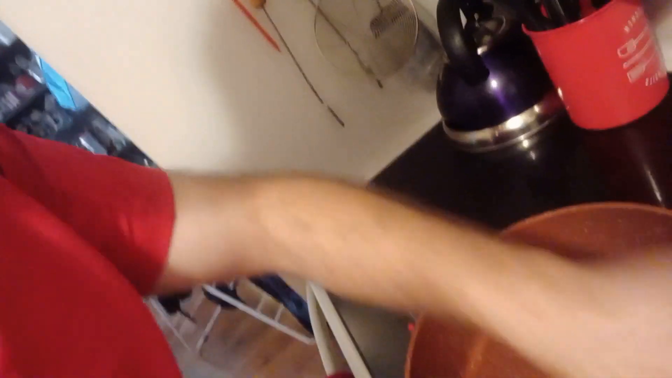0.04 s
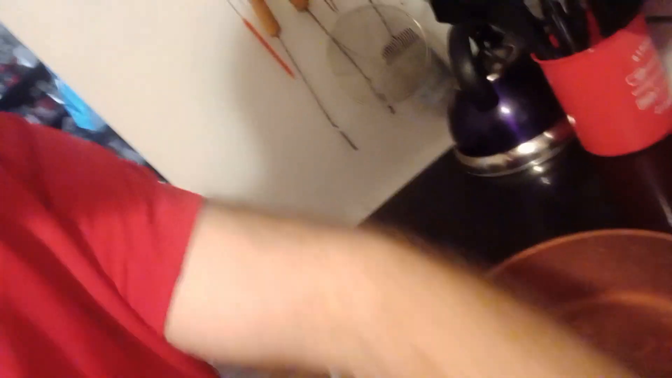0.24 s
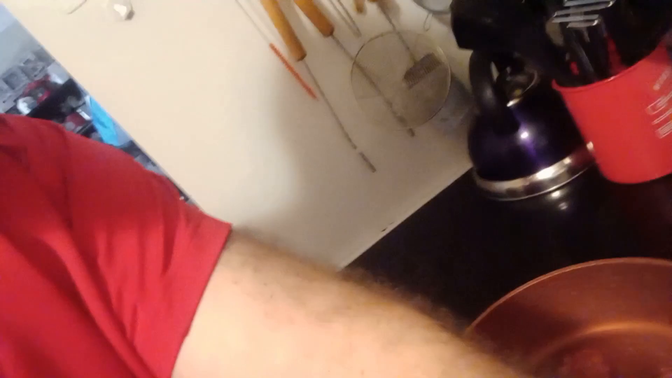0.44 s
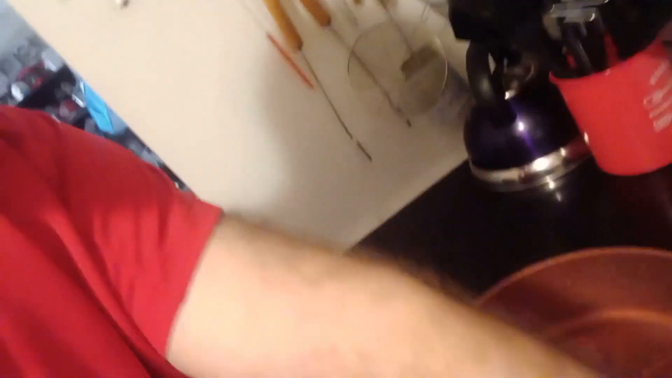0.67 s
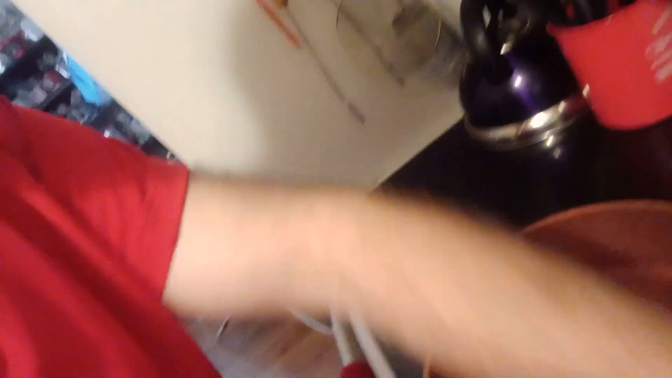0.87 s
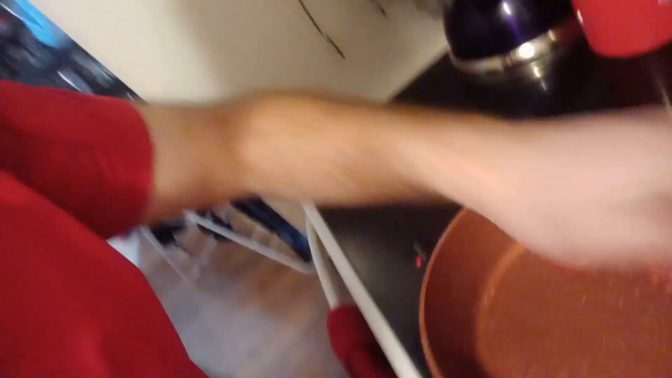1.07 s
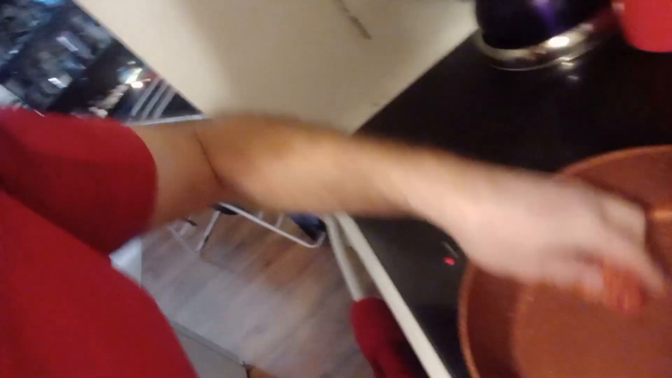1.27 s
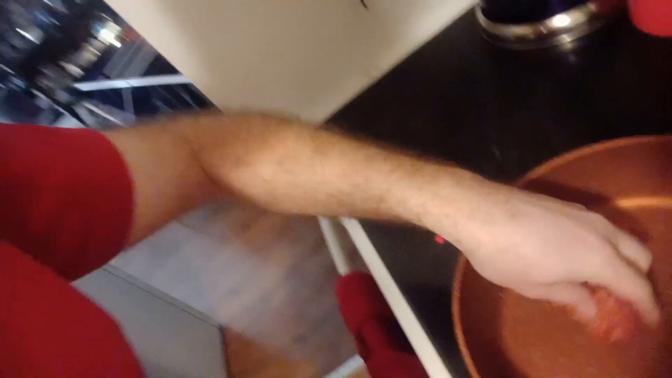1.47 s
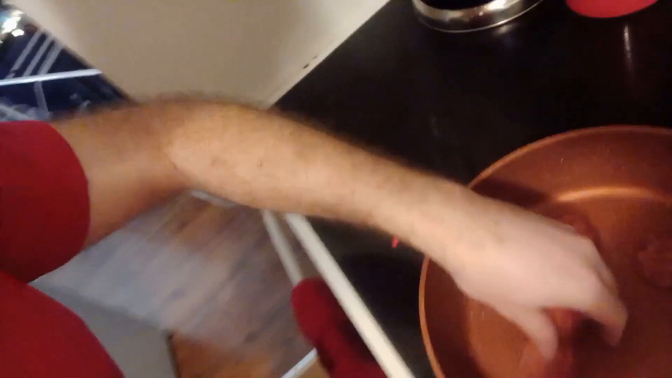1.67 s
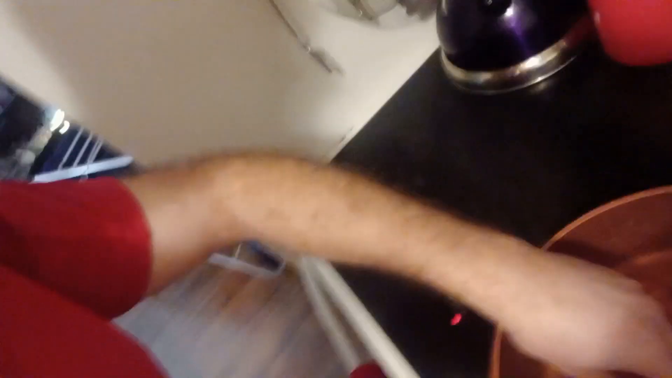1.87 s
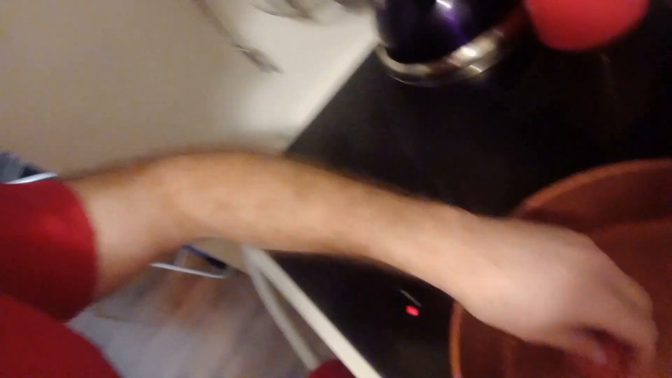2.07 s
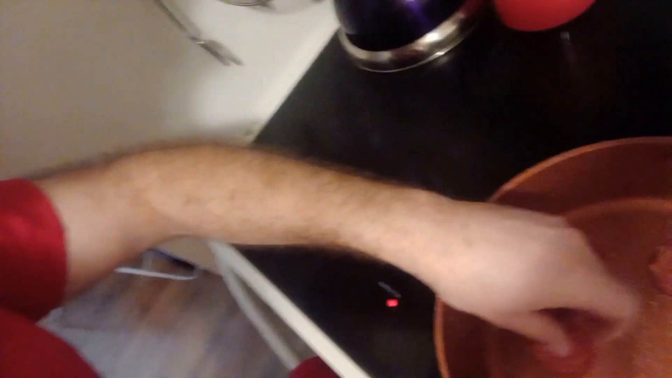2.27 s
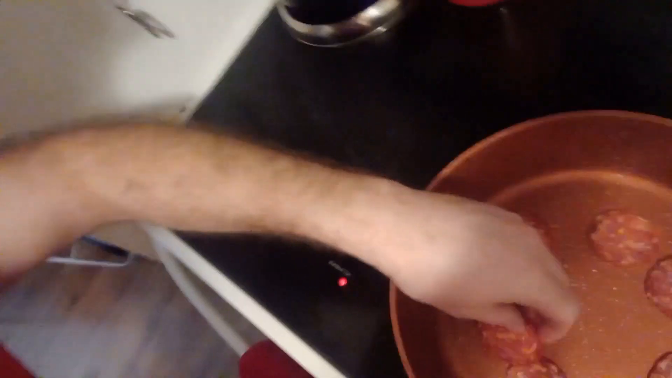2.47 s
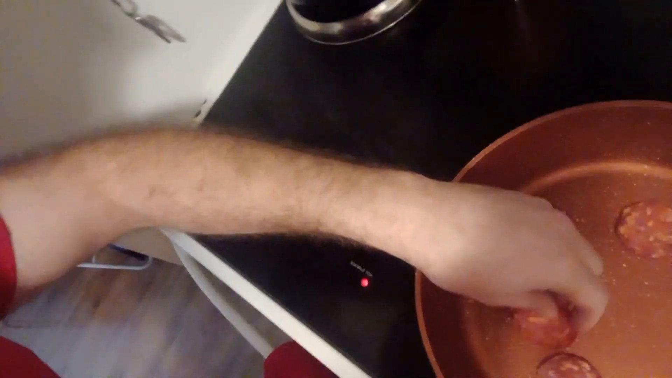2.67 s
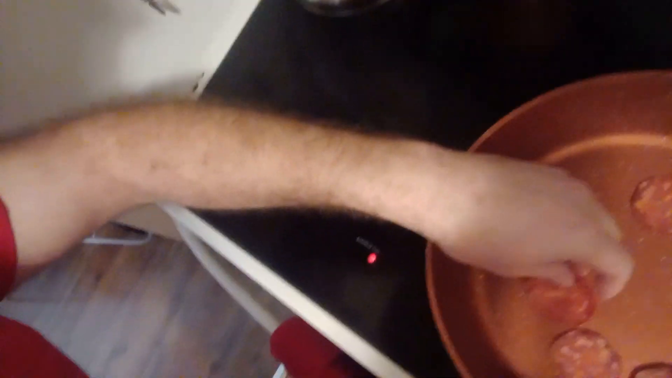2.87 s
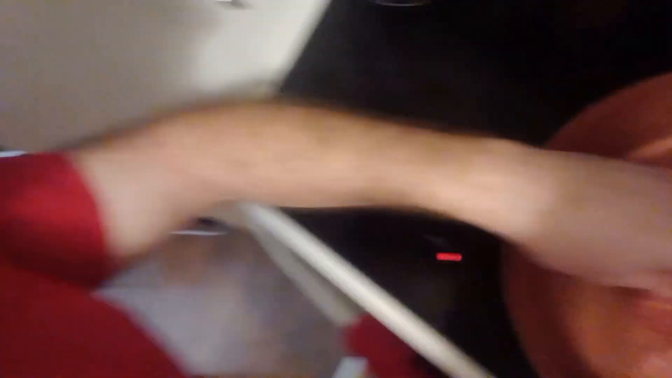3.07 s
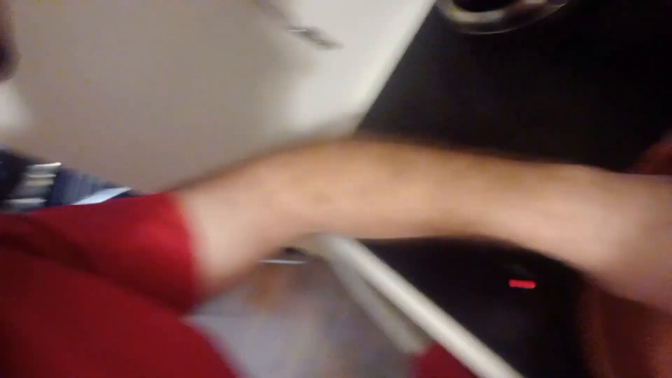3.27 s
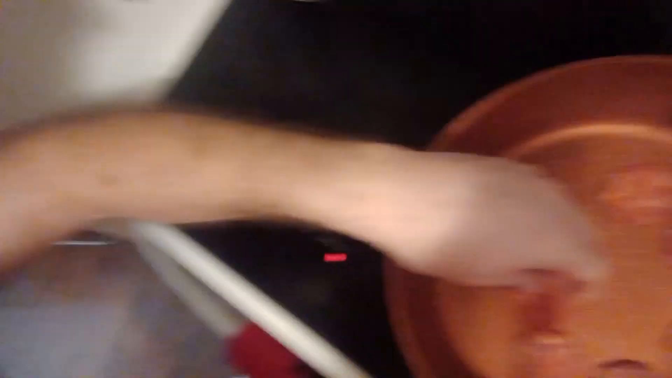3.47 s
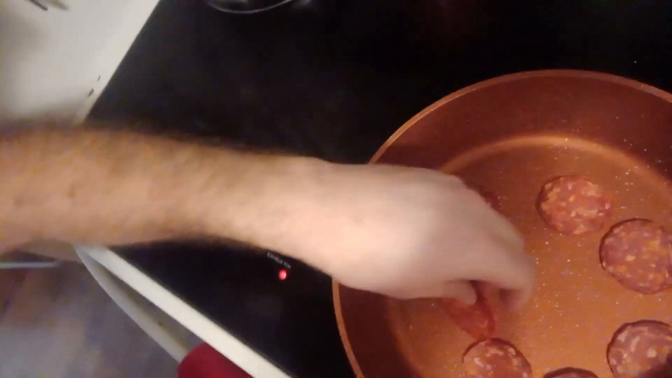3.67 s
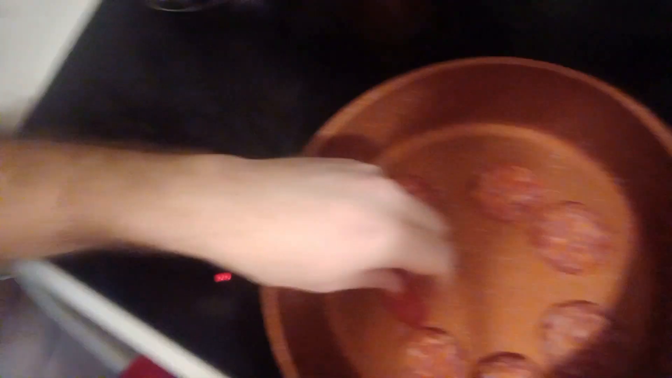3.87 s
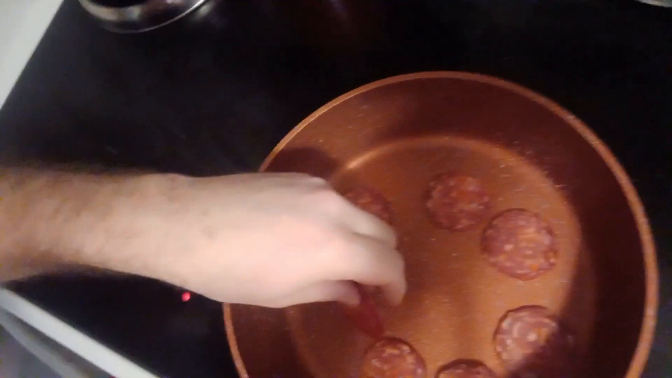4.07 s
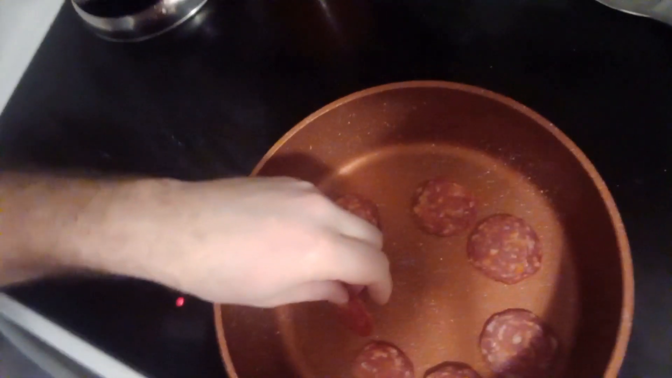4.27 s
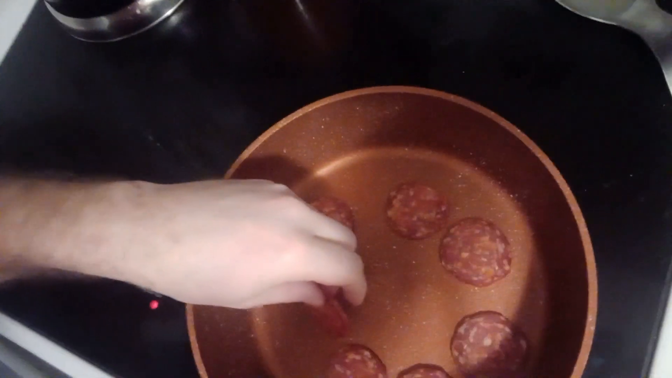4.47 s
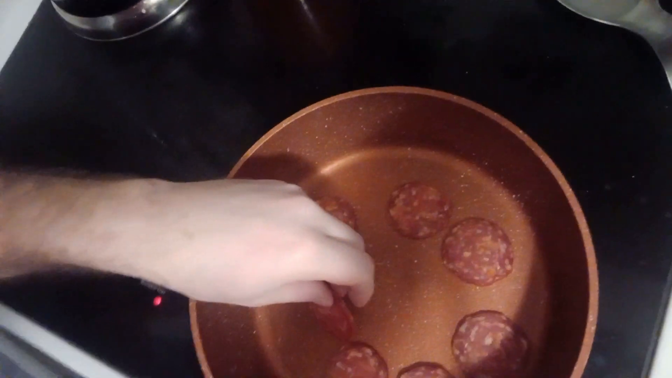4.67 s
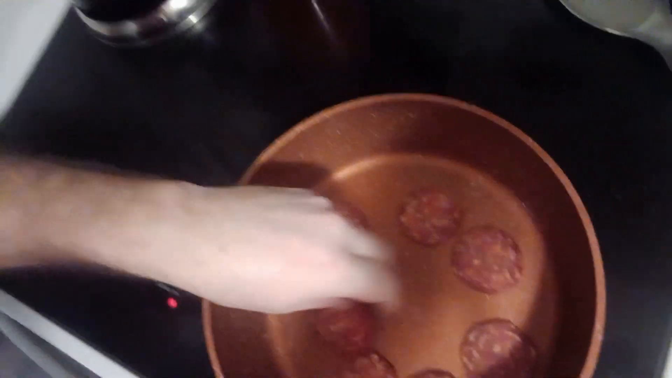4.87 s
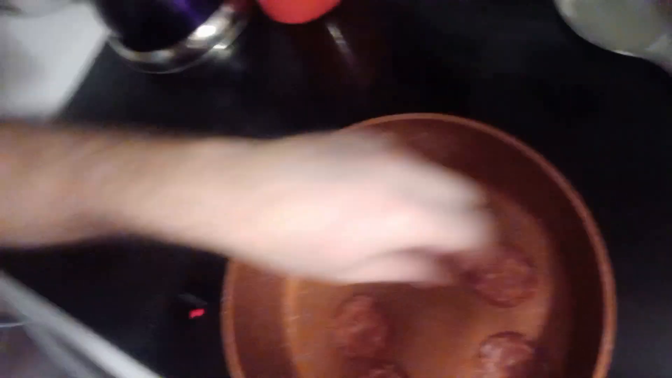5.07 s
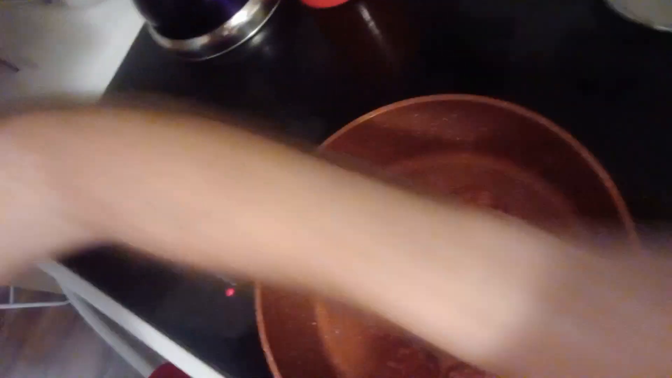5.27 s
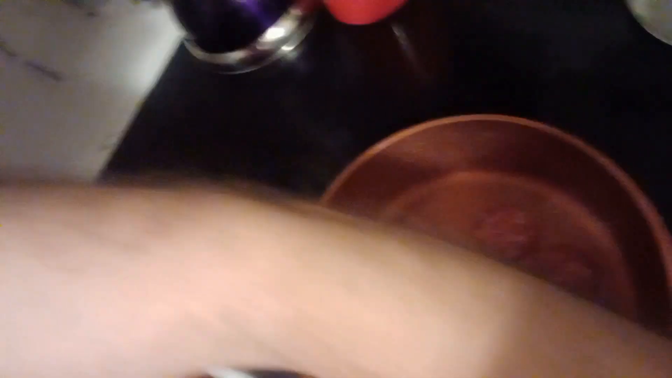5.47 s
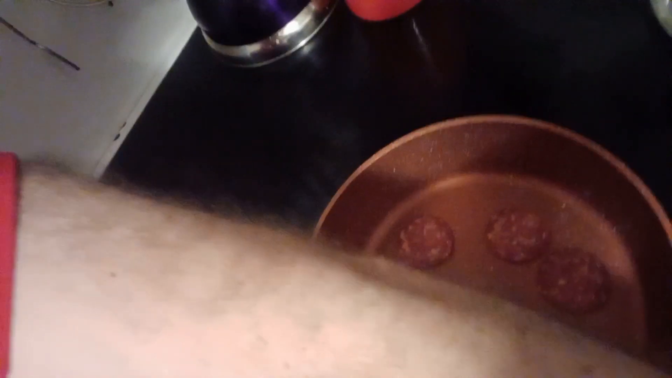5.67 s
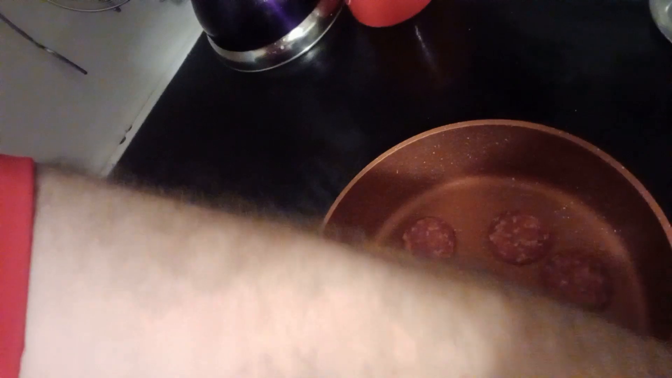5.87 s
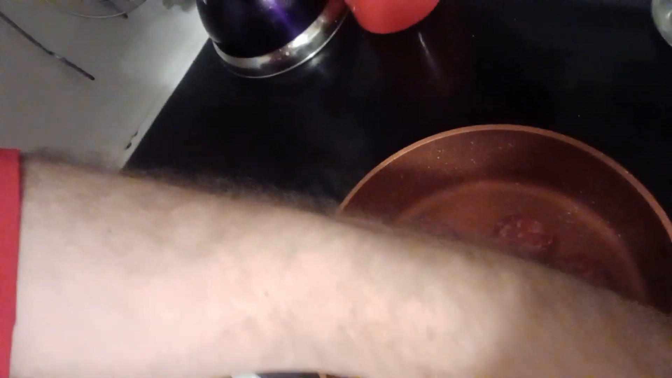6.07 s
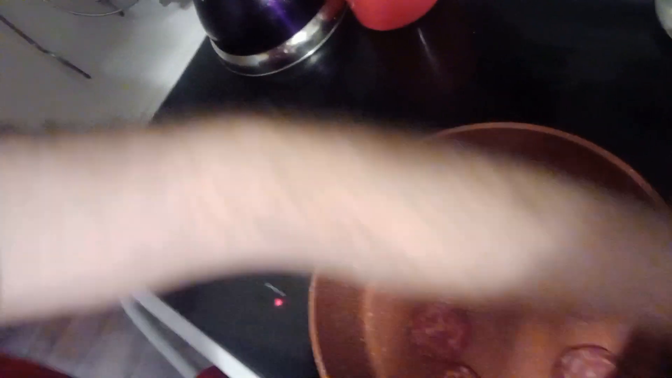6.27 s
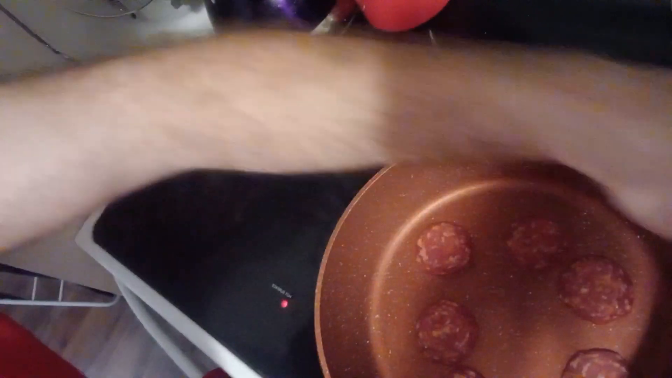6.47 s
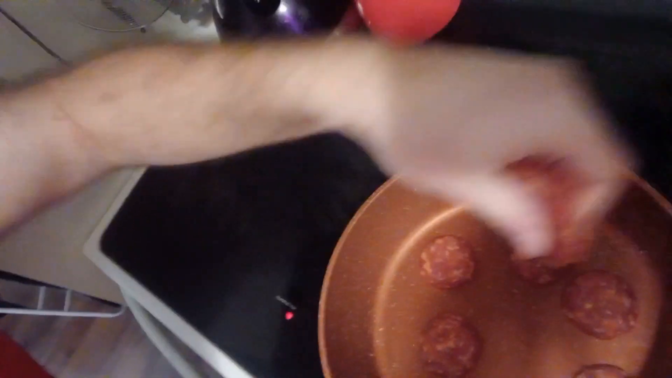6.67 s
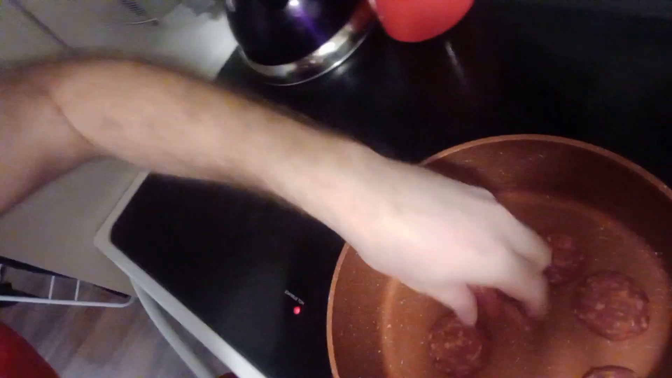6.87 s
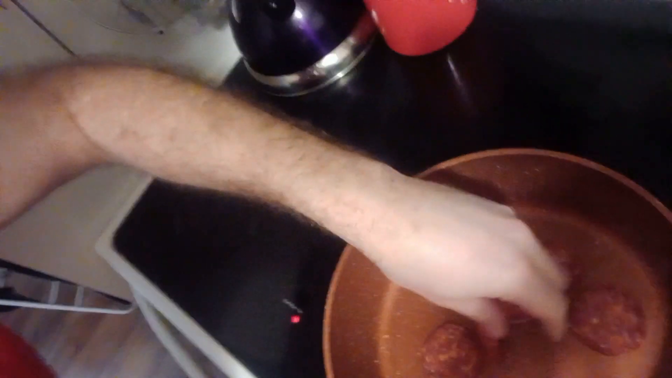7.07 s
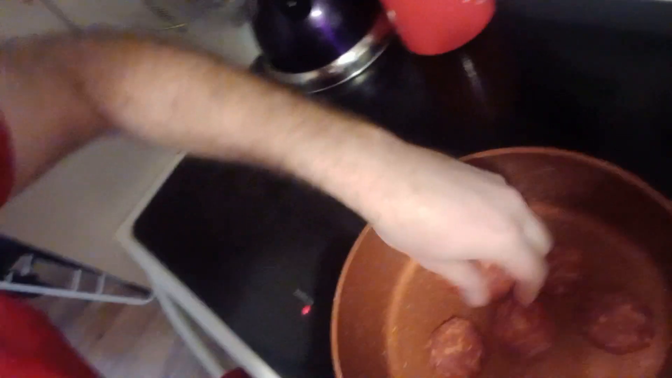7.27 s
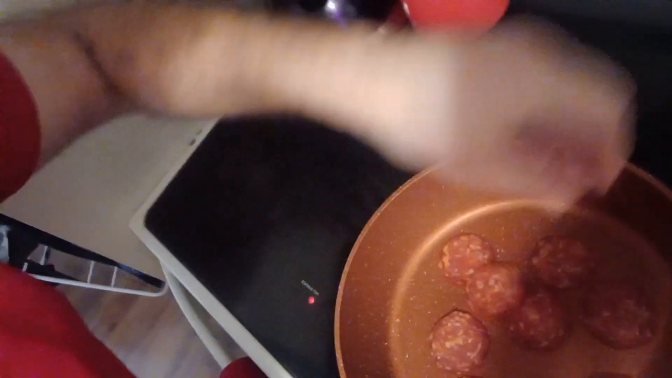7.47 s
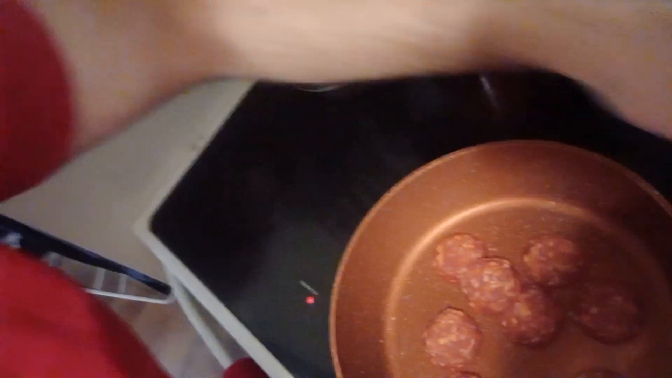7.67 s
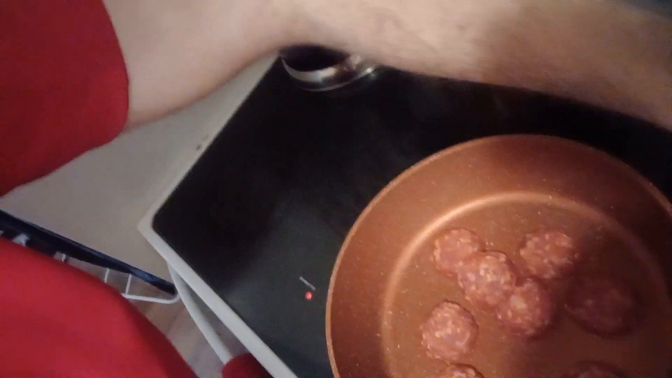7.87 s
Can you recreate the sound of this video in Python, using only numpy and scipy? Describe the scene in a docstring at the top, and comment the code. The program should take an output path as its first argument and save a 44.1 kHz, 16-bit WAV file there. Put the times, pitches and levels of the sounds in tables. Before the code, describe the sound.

Cured meat fries in a pan about an arm's length from the microphone, a little to the right. A thin fizz with scattered pops swells over the first three seconds, then keeps crackling and spitting. A couple of knocks on the pan come early and a cluster of rattling knocks comes later. Under it are a steady fridge hum, faint sleeve rustle, tiny metal tinks and a few dull floor thuds in a small kitchen.

```python
"""A fridge hums and a faint sizzle starts, growing as slices of cured meat are laid into a hot pan.
Water in the fat bursts into dense tiny clicks and louder spits. A hand and sleeve rustle, metal tinks,
shifts of weight thud through the floor, and fingers knock the pan so it rattles on the stove top.
All is heard from a small camera an arm's length away, which turns towards the pan halfway through."""
import sys
import numpy as np
from scipy import signal
from scipy.fft import rfft, irfft
from scipy.io import wavfile
from scipy.ndimage import uniform_filter1d

SR = 44100
rng = np.random.default_rng(int(sys.argv[2]) if len(sys.argv) > 2 else 0)


def output_pcm(signal):
    """Save a mono or channel-first signal as 16-bit PCM at the path in sys.argv[1].

    Samples are clipped to [-1, 1] before scaling.
    """
    pcm = np.clip(np.atleast_2d(signal).T, -1, 1) * 32767
    wavfile.write(sys.argv[1], SR, np.round(pcm).astype(np.int16))


N = 349713
TIME_S = np.arange(N) / SR
LEFT_LAG_S = 2.2e-4  # sound from the pan reaches the left microphone later


def undb(db):
    """Turn decibels into a gain to multiply by."""
    return 10 ** (np.asarray(db) / 20)


def level(x, db):
    """Set the average (rms) level."""
    return x * undb(db) / np.sqrt(np.mean(x ** 2))


def curve(table):
    """Join a table's timed rows with straight lines, giving values for every sample."""
    times_s, *columns = np.transpose(table)
    return [np.interp(TIME_S, times_s, column) for column in columns]


def colour(x, *spectra):
    """Shape the tone with the sum of tables whose rows are pitch_hz, level_db."""
    log_hz = np.log(np.linspace(1, SR / 2, 4097))
    gain_db = sum(np.interp(log_hz, np.log(hz), np.clip(db, -60, 60))
                  for hz, db in map(np.transpose, spectra))
    cepstrum = irfft(np.log(undb(gain_db)))
    cepstrum[1:4096] *= 2  # folded so the filter rings only after a click, never before
    cepstrum[4097:] = 0
    return signal.oaconvolve(x, irfft(np.exp(rfft(cepstrum))))[:N]


def band(x, low_hz, high_hz):
    """Keep the sound between two pitches."""
    return signal.sosfilt(signal.butter(2, [low_hz, high_hz], "band", fs=SR, output="sos"), x)


def keep_side(x, side, edge_hz, order=2):
    """Keep the sound on the "low" or "high" side of a pitch."""
    return signal.sosfilt(signal.butter(order, edge_hz, side, fs=SR, output="sos"), x)


def wander(rate_hz):
    """A smooth random wobble, about 1 in size."""
    hold = int(SR / rate_hz)
    steps = np.repeat(rng.standard_normal(N // hold + 1), hold)
    return 1.3 * uniform_filter1d(uniform_filter1d(steps, hold), hold)[:N]


def sides(balance_db):
    """Left and right gains; balance is left minus right, so below zero leans right."""
    return undb(np.array([balance_db, -balance_db]) / 2)


def camera_turn(before_db, after_db, middle_s=3.8, length_s=0.82):
    """The balance slides as the camera turns towards the pan."""
    return np.interp(TIME_S, [middle_s - length_s / 2, middle_s + length_s / 2], [before_db, after_db])


# The tones in the hum: pitch_hz, level_db
HUM_TONES = [(45.5, -66), (59.5, -53), (84, -66), (89, -90), (120, -54.5), (178, -74), (296, -77.5),
             (414.5, -91)]
# The tone colour of the room's air: pitch_hz, level_db
AIR_COLOUR = [(25, -6), (45, 5.5), (70, 3), (105, 1), (150, -5), (190, -10), (250, -8.5), (420, -13),
              (560, -31.5), (1400, -43), (3000, -63), (6000, -62)]

def fridge_and_air():
    """The fridge motor and mains hum steadily, over soft air noise that is much alike on both sides."""
    hum = 0
    for hz, db in HUM_TONES:
        gain = np.sqrt(2) * undb(db + 1.26 * wander(3.194))
        hum += gain * np.sin(2 * np.pi * (hz * TIME_S + rng.random()))
    shared, spread = (colour(rng.standard_normal(N), AIR_COLOUR) for _ in range(2))
    air = level(shared + 0.65 * spread * np.array([[1], [-1]]), db=-56)
    return hum * sides(-10.5)[:, None] + air * sides(-3.5)[:, None]


# The tone colour of a bursting bubble: pitch_hz, level_db
BURST_COLOUR = [(710, -65), (1200, -33.5), (1460, -38), (1660, -31), (2250, -31), (2650, -27),
                (2900, -19.5), (3150, -18.5), (3510, -19), (3870, -17), (6580, -8.5), (8170, -16),
                (9310, -18.5), (13300, -1.5), (15200, 0), (16000, -15.5)]
# Which side each pitch leans to: pitch_hz, balance_db
BURST_BALANCE = [(1500, 0.5), (4000, 13.5), (6500, 4.5), (9000, 9), (11500, -4), (15000, 8)]

def bursts(start_s, gain, place, treble_db):
    """Each bubble is one click; its place in the pan (-1 to 1) sets how late the left side hears it."""
    low, high = np.zeros((2, 2, N))
    for side, lag_s in enumerate((LEFT_LAG_S + 2e-4 * place, 0)):
        at = np.clip(((start_s + lag_s) * SR).astype(int), 0, N - 1)
        np.add.at(low[side], at, gain[side] * undb(-treble_db / 2))
        np.add.at(high[side], at, gain[side] * undb(treble_db / 2))
    clicks = keep_side(low, "low", 9000, order=4) + keep_side(high, "high", 9000, order=4)
    leans = [[(hz, db * sign / 2) for hz, db in BURST_BALANCE] for sign in (1, -1)]
    return np.array([colour(channel, BURST_COLOUR, lean) for channel, lean in zip(clicks, leans)])


# How the frying grows: time_s, level_db, treble_db (highs compared with lows)
FRYING = [(0.0, -56, 14), (0.33, -56, 14), (0.45, -48, -2), (0.77, -52.5, 19), (1.06, -45.5, 5),
          (1.43, -40.5, 6.5), (2.21, -38, 8.5), (2.67, -38, 4.5), (2.95, -36, 6), (3.1, -34.5, 0.5),
          (3.3, -34.5, 3), (3.45, -35.5, 4), (3.7, -35.5, 3), (4.02, -36, 0), (5.19, -34.5, 2),
          (5.34, -38.5, 0), (5.56, -34.5, 0.5), (6.23, -36, 0.5), (6.7, -34, 1.5), (7.05, -33.5, 1),
          (7.3, -34.5, 4.5), (7.6, -33, 3.5), (7.93, -32.5, 1.5)]

def sizzle(bubbles=60000):
    """Thousands of steam bubbles burst each second, few of them large, swelling in short flurries."""
    fry_db, treble_db = curve(FRYING)
    when, size, sign, place, tone = rng.random((bubbles, 5)).T
    at = (when * (N - 1)).astype(int)
    flurry_db = wander(12) + 1.2 * wander(60)
    size_db = np.minimum(-3.4 * np.log(1 - size), 18)  # capped: bigger bursts are the spits
    gain = undb(size_db + flurry_db[at]) * np.sign(sign - .5)
    tone_db = treble_db[at] + 1.5 * wander(15)[at] + 12 * (tone - .5)
    place = 2 * place - 1
    fizz = bursts(at / SR, gain * sides(place), place, tone_db)
    # the kitchen walls return the fizz as smooth hiss
    hiss = np.array([colour(noise, BURST_COLOUR) for noise in rng.standard_normal((2, N))])
    frying = level(fizz, 0.87) + level(hiss, -4.5)
    # the very highest fizz grows from 5 s to 7 s
    prickle = np.interp(TIME_S, [5, 7], [0, 0.39]) * keep_side(frying, "high", 11000)
    return (frying + prickle) * undb(fry_db) * sides(camera_turn(-8, -5.5))


# Hand and sleeve movements: middle_s, length_s, cloth_db, skin_db
MOVEMENTS = [(0.17, 0.3, -89, -72.5), (0.465, 0.23, -97, -57.5), (0.554, 0.3, -72, -68),
             (1.147, 0.068, -67, -72), (1.215, 0.21, -65.5, -67.5), (1.584, 0.26, -59.5, -65),
             (1.777, 0.08, -69, -65), (2.16, 0.079, -69.5, -91), (5.083, 0.31, -67.5, -62.5),
             (5.82, 0.2, -71, -65), (6.126, 0.13, -71, -88), (6.597, 0.22, -56.5, -60),
             (7.076, 0.12, -55.5, -65), (7.445, 0.32, -58.5, -78), (7.693, 0.068, -87, -62)]

def rustle():
    """Cloth rubs in uneven grains; skin slides smoother and higher. Each movement swells and fades."""
    cloth_gain = undb(-81 + TIME_S)  # faint fidgeting between movements slowly grows
    skin_gain = undb(-95 + 4 * TIME_S)
    for middle_s, length_s, cloth_db, skin_db in MOVEMENTS:
        swell = np.exp(-.5 * (3 * (TIME_S - middle_s) / length_s) ** 2)
        cloth_gain += undb(cloth_db) * swell
        skin_gain += undb(skin_db) * swell
    rub, slide = rng.standard_normal((2, 2, N))
    cloth = band(band(rub * undb(2 * wander(70)), 436, 1240), 436, 1240)
    skin = band(band(slide * undb(1.5 * wander(40)), 1550, 2300), 1550, 2300)
    skin += undb(-5.5) * band(band(slide, 3050, 4140), 3050, 4140)
    return level(cloth, 0) * cloth_gain + level(skin, 0) * skin_gain


def ring(push, tones):
    """Pushed metal rings at its own tones, each fading by 60 dB in ring_s; neighbours swing opposite."""
    sound = 0
    for k, (hz, db, ring_s) in enumerate(tones):
        fade = np.exp(-np.log(1000) / (ring_s * SR))
        angle = 2 * np.pi * hz / SR
        tone = signal.lfilter([0, fade * np.sin(angle)], [1, -2 * fade * np.cos(angle), fade ** 2], push)
        sound += (-1) ** k * undb(db) * tone
    return sound / len(tones) ** .5


# Faint metal tinks: start_s, level_db, pitch_hz, ring_s
METAL_TINKS = [(.1, -58, 4350, 0.012), (0.117, -57, 4200, 0.01), (0.149, -61, 4230, 0.012),
               (0.398, -59, 4750, 0.011), (3.588, -56, 2270, 0.011), (7.286, -44, 3600, 0.012)]

def tinks():
    """A tiny scratch sets three close, high tones ringing in the metal."""
    sound = np.zeros(N + SR)
    t = np.arange(SR // 3) / SR
    for start_s, db, hz, ring_s in METAL_TINKS:
        at = int(start_s * SR)
        scratch = 0.3 * rng.standard_normal(len(t)) * np.exp(-t / 0.008)
        sound[at:at + len(t)] += ring(scratch, [(hz * ratio, db, ring_s) for ratio in (1, 1.045, .955)])
    return sound[:N]


# Loud spits of fat: start_s, crack_db, treble_db, balance_db, spray_db (compared with the crack)
LOUD_SPITS = [(0.1856, -20, 4, -11, -13), (0.398, -21.5, 2, 5, -9), (0.427, -23, 8, -11, -19),
              (0.6342, -13, 4, -13, -10.5), (0.7325, -16, 0, -15, -10), (0.763, -15.5, 4, -14, -15),
              (0.9075, -17, 17, -14, -21), (1.4954, -6, 6, -12, -18), (1.208, -18, -10, -14, -6.5),
              (1.457, -5, 1, -11, -15), (1.652, -16.5, -13, -1, -8), (2.043, -7.5, 3, -20, -16),
              (2.325, -6.5, 14, -11, -20), (2.446, -6, -3, -12, -12), (2.6277, -3.5, 8, -25, -24),
              (2.7055, -15, 8, -15, -21), (2.688, -13.5, 2, -18, -9), (2.803, -7, 8, -25, -29),
              (2.8138, -7, 8, -22, -24), (3.0347, -5.5, -13, -13, -11), (3.078, -8.5, -7, -18, -13),
              (3.12, -12, 10, -17, -24), (3.139, -8, -3, -24, -29), (3.156, -12, -8, -18, -19),
              (3.255, -12, 14, -22, -19), (3.284, -8, -6, -28, -23), (3.2905, -4, 10, -24, -22),
              (3.373, -3.5, -3, -17, -10), (3.377, -5, -10, -22, -16), (3.425, -15, 10, -20, -22),
              (3.4582, -5, -6, -12, -9.5), (3.491, -9, 8, -18, -16), (3.570, -10, 2, -15, -14),
              (3.512, -4, 8, -15, -24), (3.607, -9, 1, -8, -18), (3.8321, -2, -2, -17, -18),
              (4.075, 0, 3, -17, -23), (4.245, -1.5, -6, -8, -12.5), (4.4207, -6.5, -6, -9, -6.5),
              (5.0327, -4, 10, -10, -19), (5.0683, -6, 6, -9, -10), (5.334, -6.5, 0, -3, -12.5),
              (5.375, -3, 8, -4, -12), (5.4955, -8, 16, -10, -19), (5.641, -10, 17, -14, -19),
              (5.687, -10, 15, -7, -8), (5.825, -6, 4, -8, -8), (6.356, 10, 6, -4, -20),
              (6.5592, -4, 8, -3, -5), (6.7728, -5.5, 15, -6, -10.5), (6.794, -8, 12, -4, -12),
              (6.957, -9, 9, -2, -20), (7.083, -8, 14, -3, -6), (6.85, 4, 9, -4, -20),
              (7.101, -4, 15, -4, -11), (7.1267, -2, -2, -9, -7), (7.167, -2, 6, -3, -9),
              (7.328, -12, 12, -4, -18), (7.352, -10, 12, -4, -20), (7.378, -6, 5, -6, -7),
              (7.47, 0, 15, -3, -19), (7.493, -8, 12, -2, -12), (7.633, -6, 12, -4, -12),
              (7.748, -1, 10, -4, -15), (7.891, -7, 15, -4, -14), (7.692, -7.5, -5, -7, -4),
              (7.702, -0.5, 8, -2, -11.5), (7.734, -5, 2, -3, -10.5), (7.84, -1, 0, -10, -22)]

def spits(small_count=110, clicks_each=40):
    """Each spit is a sharp crack, then a fading spray of droplets. Small ones come at random."""
    when, size, tone, spot = rng.random((small_count, 4)).T
    at = (when * (N - 1)).astype(int)
    fry_db, _ = curve(FRYING)
    small_spits = [at / SR,  # same columns as LOUD_SPITS
                   fry_db[at] + 14 - 7.5 * np.log(1 - 0.9 * size),
                   -7 * (2 * tone - 1),
                   camera_turn(-26, -11)[at] + 4 * (2 * spot - 1),
                   np.full(small_count, -19)]
    all_spits = np.hstack([np.transpose(LOUD_SPITS), small_spits])
    start_s, crack_db, treble_db, balance_db, spray_db = np.repeat(all_spits, clicks_each, axis=1)
    lateness, sign, place = rng.random((len(start_s), 3)).T
    is_crack = np.arange(len(start_s)) % clicks_each == 0
    delay_s = np.where(is_crack, 0, .0003 + .012 * lateness ** 2)
    click_db = crack_db + np.where(is_crack, 0, spray_db - 4 * lateness)
    gain = undb(click_db) * np.sign(sign - .5) * sides(balance_db)
    return bursts(start_s + delay_s, gain, np.where(is_crack, 0, 2 * place - 1), treble_db)


# Thuds through the floor: start_s, level_db, length_s, pitch_hz
FLOOR_THUDS = [(0.417, -37, 0.12, 79.9), (0.58, -40.5, 0.031, 69.7), (5.643, -34, 0.1, 69.1),
               (5.788, -40, 0.12, 67.2), (7.365, -57, 0.04, 79.3)]

def thuds(rise_s=0.013, fall_db_per_s=345):
    """The floor answers each shift of weight with a low, wavering boom: quick rise, hold, steep fall."""
    wavering_time_s = np.cumsum(1 + .05 * wander(30)) / SR
    shake = np.sqrt(2) * undb(2 * wander(40))
    boom = 0
    for start_s, db, length_s, hz in FLOOR_THUDS:
        rise = np.clip((TIME_S - start_s) / rise_s, 0, 1) ** 2
        fall_db = fall_db_per_s * np.maximum(TIME_S - start_s - length_s, 0)
        boom += rise * undb(db - fall_db) * np.sin(2 * np.pi * hz * wavering_time_s)
    return boom * shake * sides(-3.7)[:, None]


# The tones of the five parts a knock rings: pitch_hz, level_db, ring_s
STOVE_TONES = [(96, -2.5, 0.36), (107, -7, 0.28), (127.2, 2.5, 0.2), (170.5, 3, 0.16)]
BASE_TONES = [(251, 1.4, 0.077), (311.6, 3.8, 0.095), (359, 1.8, 0.076), (416, -1.5, 0.08)]
HANDLE_TONES = [(529, 6.8, 0.034), (631.4, 8.1, 0.077), (644, 8.6, 0.1), (765, 9.1, 0.015)]
WALL_TONES = [(996, -11, 0.058), (1110, 3.5, 0.03), (1247, 7, 0.022), (1480, 6.5, 0.008)]
FINGERNAIL_TONES = [(1915, 6, .01), (2360, 9, .006), (3400, 15, .003), (4400, 13, .003), (5600, 10, .003)]
# How long a knock pushes each of those parts: push_s
PUSH_TIMES = [.003, .0012, .0006, .0003, .00005]
# The mix of pan base, handle, wall and fingernail: level_db
PAN_MIX = [0.65, -5.5, -2, -6.5]
# Knocks: start_s, stove_db, pan_db, bright_db (added per step along PAN_MIX), wall_extra_db, rattle_s
FINGER_KNOCKS = [(.428, -34.5, -47.5, -13, 7, 0.052), (0.487, -56, -46.5, -5.5, 1, 0.021),
                 (0.532, -60, -46, -2.5, -4, 0.051), (1.748, -32.5, -43.5, -1, 2.5, 0.05),
                 (3.034, -72, -76, 10, 1, 0.018), (3.384, -66, -84, 14.5, -6, 0.023),
                 (4.836, -40, -72, 7, -4, 0.028), (4.949, -55, -65, 4.5, 17, .008),
                 (4.958, -37.5, -46, 7, 4, 0.011), (5.019, -43, -50.5, 3.5, 4, 0.025),
                 (5.674, -35, -46, -3, -10, 0.026), (5.685, -50, -36, -10.5, -9, 0.038),
                 (5.721, -38, -44, 1.5, -20, 0.051), (5.773, -39.5, -43, -18, -10, 0.024),
                 (5.836, -60, -44.5, -7, 1, 0.035), (5.886, -44, -51.5, -9, -5, 0.048),
                 (6.498, -30, -28.5, 0, -3, 0.023), (6.52, -42, -35.5, -4, -5, 0.073),
                 (6.636, -37, -37, 2, -0.5, 0.021), (7.044, -29.5, -28.5, -2, -4.5, 0.029),
                 (7.289, -49, -46.5, 3.5, 3.5, 0.022), (7.376, -43.5, -53.5, 6, 0, 0.011),
                 (7.415, -31.5, -52, 4.5, 6, 0.0097), (7.431, -41, -48, 4, -12, 0.052),
                 (7.499, -46, -48.5, 3, 7.5, 0.0062), (7.588, -47, -54, 4, 3, 0.02)]

def knocks(detune=.015, scatter_db=1.5):
    """Fingers strike the pan, which rings and rattles on the stove top for a moment."""
    parts = (STOVE_TONES, BASE_TONES, HANDLE_TONES, WALL_TONES, FINGERNAIL_TONES)
    sound = np.zeros(N + SR)
    t = np.arange(SR // 3) / SR
    for start_s, stove_db, pan_db, bright_db, wall_extra_db, rattle_s in FINGER_KNOCKS:
        at = int(start_s * SR)
        levels_db = [stove_db, *(pan_db + np.array(PAN_MIX) + bright_db * np.arange(4))]
        levels_db[3] += wall_extra_db
        forces = undb(-32) * rng.standard_normal((5, len(t))) * np.exp(-t / rattle_s)
        forces[:, 0] = 1  # the blow itself, ahead of the rattle
        for force, part_db, push_s, tones in zip(forces, levels_db, PUSH_TIMES, parts):
            width = int(push_s * SR)
            push = np.convolve(force, np.ones(width) / width)[:len(t)]
            # each blow lands somewhere new and wakes the tones differently
            struck = [(hz * (1 + rng.normal(0, detune)), db + rng.normal(0, scatter_db), ring_s)
                      for hz, db, ring_s in tones]
            sound[at:at + len(t)] += undb(part_db) * ring(push, struck)
    return sound[:N]


def room(sound, ring_s=0.16, echo_db=-0.5):
    """Sound from the stove arrives a little to the right, with its own short echo on each side."""
    left = np.pad(sound, (int(LEFT_LAG_S * SR), 0))[:N]
    direct = np.array([left, sound]) * sides(-3)[:, None]
    t = np.arange(SR // 2) / SR
    tails = band(rng.standard_normal((2, len(t))), 297, 9400) * np.exp(-np.log(1000) * t / ring_s)
    tails /= np.linalg.norm(tails, axis=1, keepdims=True)
    return direct + undb(echo_db) * signal.oaconvolve(direct, tails, axes=1)[:, :N]


def scene():
    """Everything that reaches the two microphones."""
    pan = sizzle() + spits() + room(knocks() + tinks())
    return pan + thuds() + rustle() + fridge_and_air()


def record(dry):
    """The camera cuts deep bass, rounds off the loudest cracks and cuts the highest treble."""
    rounded = 1.5 * np.tanh(keep_side(dry, "high", 40) / 1.5)
    return signal.sosfilt(signal.ellip(10, .2, 80, 15850, fs=SR, output="sos"), rounded)


dry = scene()
out = record(dry)
output_pcm(out)
```